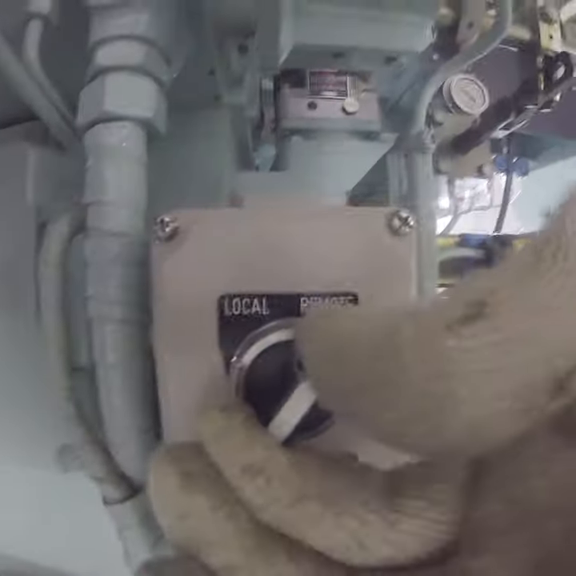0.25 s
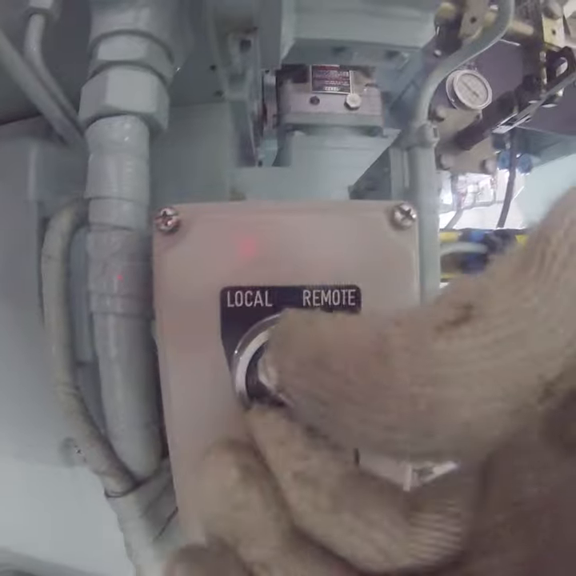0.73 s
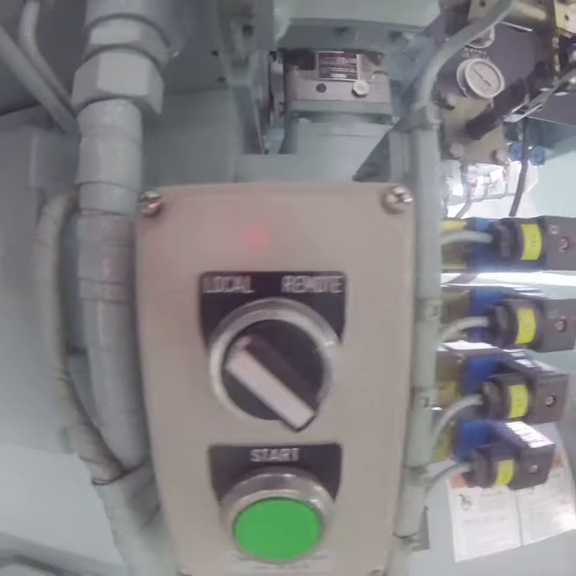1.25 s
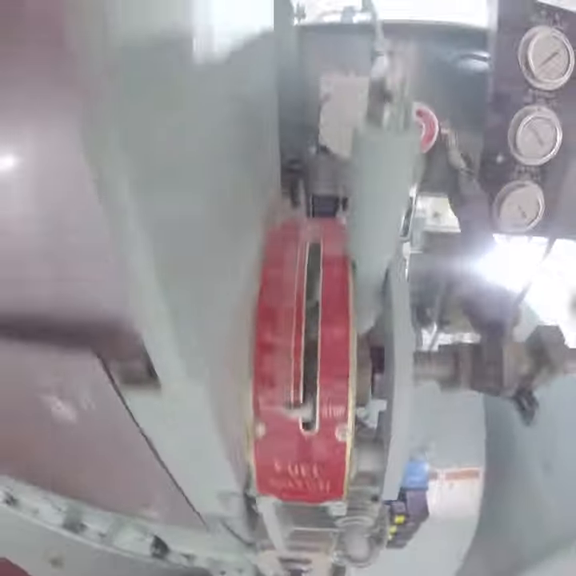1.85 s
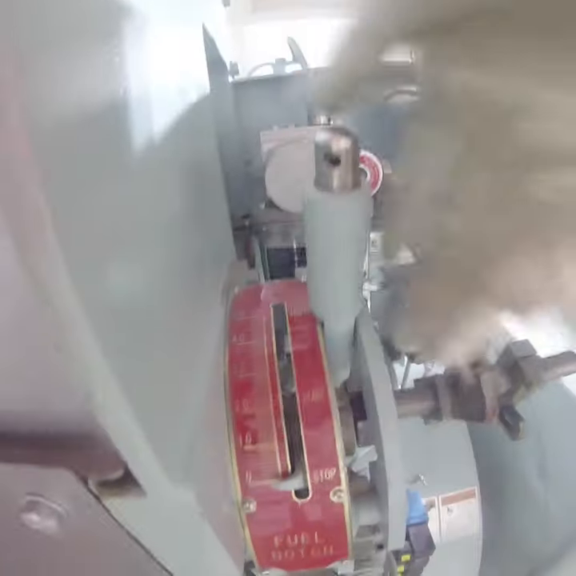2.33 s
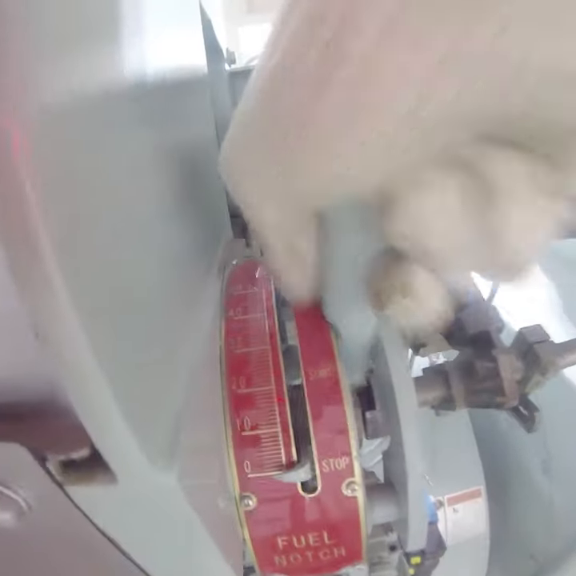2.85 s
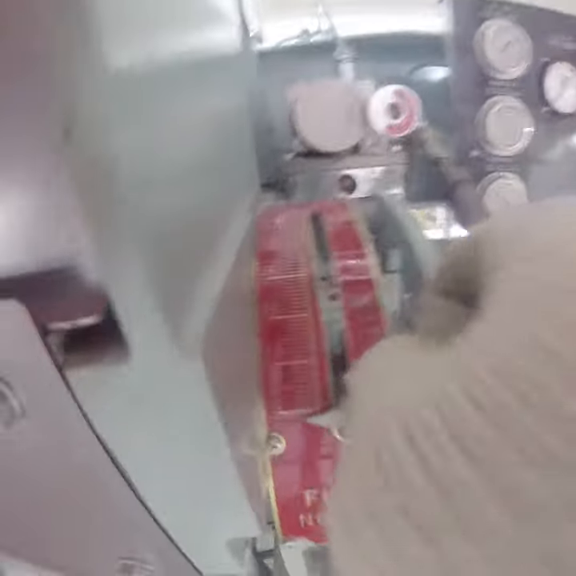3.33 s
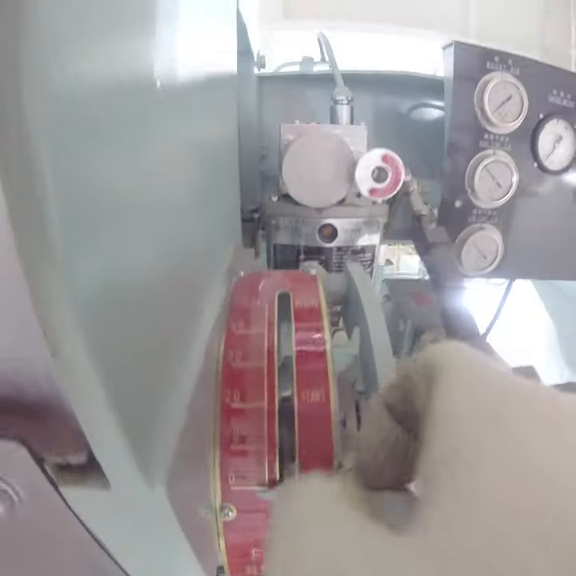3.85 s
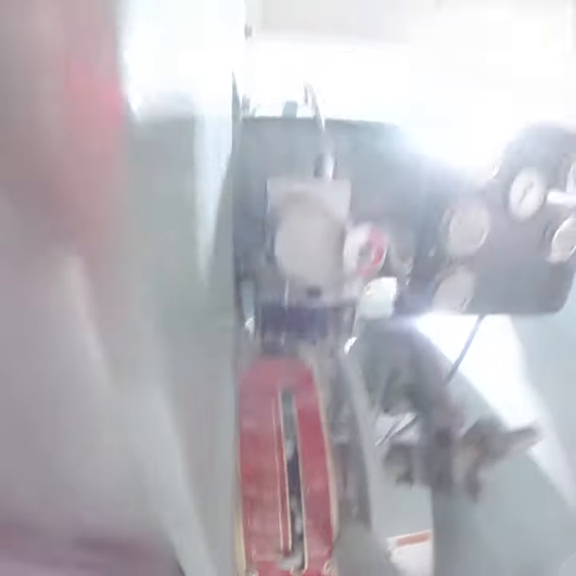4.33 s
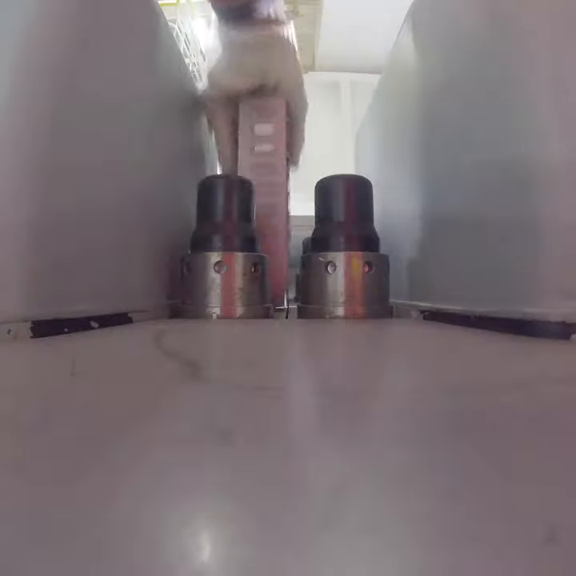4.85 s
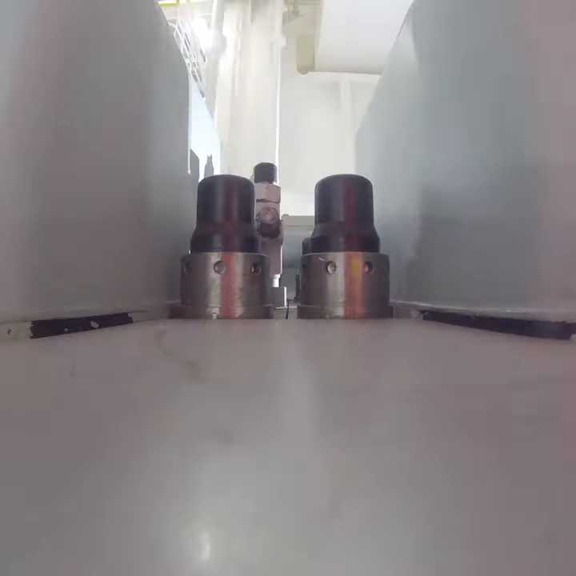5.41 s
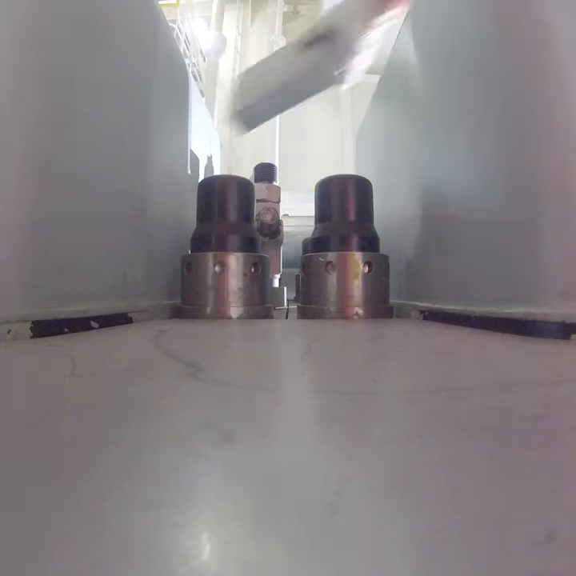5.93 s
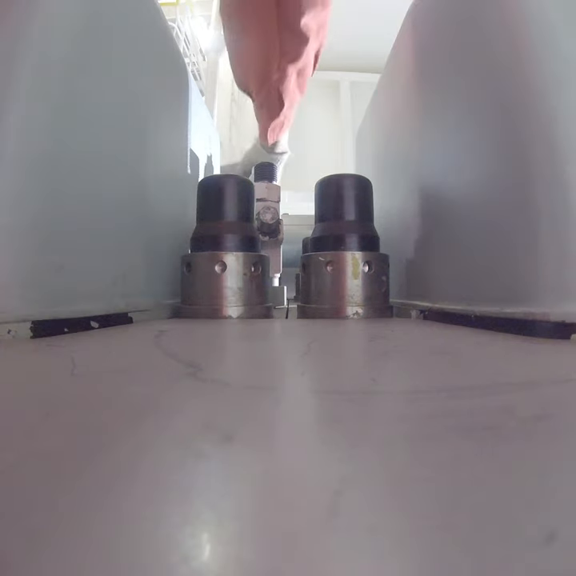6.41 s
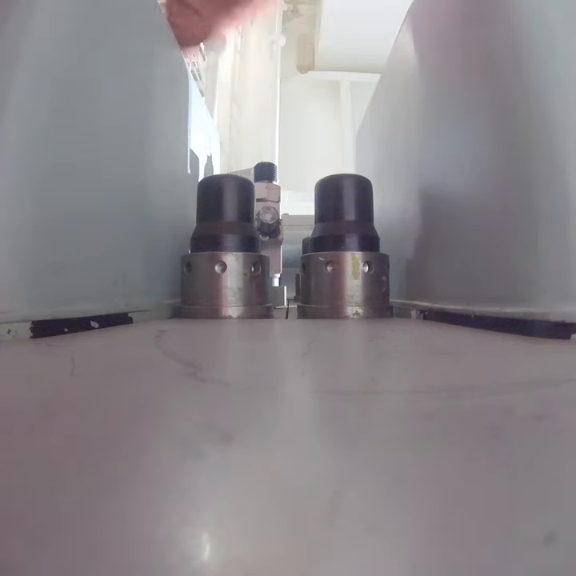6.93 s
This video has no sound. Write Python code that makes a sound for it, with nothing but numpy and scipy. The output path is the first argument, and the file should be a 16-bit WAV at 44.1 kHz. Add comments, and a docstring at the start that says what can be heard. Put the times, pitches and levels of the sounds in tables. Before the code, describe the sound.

A ship's engine room, loud throughout: a large diesel and pumps give a thick, steady low drone with rough broadband roar and a fast repeating clatter about seven and a half times a second. Above it a thin turbocharger whine near 2.7 kHz, with fainter higher tones, constantly fades and returns. At 0.78 s a switch gives one hard, short click. At about 1.55 s the drone abruptly changes colour, with a faint tick, as the listening place moves. Around 3.0 s a glove brushes softly on metal, barely audible. At 4.8 s the place jumps again and the hum balance shifts. From 4.97 to 5.05 s bright metal rattles rapidly, with another knock at 5.17 s. Duller, clunkier knocks and scrapes run from 6.38 to 6.75 s with thin hiss. From 7.1 s compressed air hisses brightly to the end. Small microphone, compressed peaks, dull top.

```python
"""A roaring drone and a fading whine, a switch click, metal knocks, a soft rub, and hiss at the end: a ship's
engine room beside a generator set, the balance of the sound shifting abruptly twice. Diesel and pumps are sums
of steady sines; the hall's roar is coloured noise that partly repeats each engine cycle. Turbocharger whines
are sines and fading tones; the hand's blows are noise bursts through resonances; rub and air are band-passed
noise, and faint ticks are single samples. A small microphone dulls the top."""
import sys
import numpy as np
from scipy import signal
from scipy.fft import rfft, irfft
from scipy.io import wavfile
from scipy.ndimage import uniform_filter1d

SR = 44100
rng = np.random.default_rng(int(sys.argv[2]) if len(sys.argv) > 2 else 0)


def wrap_up_sound(samples):
    """Save the sound to the file named by the first command line argument, as 16-bit audio."""
    columns = np.atleast_2d(samples).T
    # keep every value between -1 and 1, then stretch to whole-number steps
    tamed = np.clip(columns, -1, 1)
    steps = np.round(tamed * 32767).astype(np.int16)
    wavfile.write(sys.argv[1], SR, steps)


N = 316197
TIME_S = np.arange(N) / SR

# Moments when the sound shifts abruptly to a new balance, in seconds.
CHANGES_S = [1.555, 4.8]

# Roar of the hall between the tones, low and high part. # Each row: frequency in Hz, mean level in dB per Hz in
# part 1, 2, 3.
RUMBLE_HZ_DB = [(12, -77, -54, -46), (24.2, -45, -35.5, -58), (32, -45, -50, -40),
                (41.8, -39.5, -45, -43.5), (54.7, -44, -45, -46.5), (82.5, -49.5, -43.5, -45.5),
                (102, -44.5, -40.5, -46.5), (124, -43, -47.5, -45.5), (149, -49, -44.5, -44.5),
                (184, -44, -49, -43), (215, -50.5, -46.5, -45.5), (256, -49, -52.5, -47),
                (345, -51, -53, -52), (405, -52.5, -54, -54)]
ROAR_HZ_DB = [(594, -57, -56, -57), (950, -55, -57, -59), (1300, -60.5, -62, -61.5), (1740, -63, -64, -64),
              (2230, -68, -67.5, -68.5), (2760, -70, -68.5, -69.5), (4300, -79.5, -78, -80),
              (5330, -74, -73, -75), (5720, -78, -78, -78.5), (6490, -74.5, -72.5, -70.5),
              (6930, -84.5, -84, -82.5), (8410, -86.5, -84, -84.5), (9310, -102, -100, -98),
              (10150, -108, -105, -104), (11200, -113, -111, -105), (11300, -140, -138, -132)]
# Slow swell of the roar. Each row: time in seconds, middle, treble and bass gain in dB.
SWELL_S_DB = [(0, -1, -1, -1), (1.4, -.5, -1.5, 2), (2.2, 1, 1, 1), (3.4, 0, -1, -1), (4.77, 0.5, 1.5, 0),
              (4.82, -2.5, -2, -2.5), (5.4, 0, -0.5, -0.5), (6.2, 1.5, 1, .5), (7.17, 1, 1.5, 3)]
CLATTER_SHARE, CLATTER_KEEP = 0.49, 0.832  # power share before band limits; carry-over between cycles
CLATTER_LOW_HZ, CLATTER_TOP_HZ = 248, 2180

CYCLE_HZ = 7.5087  # one four-stroke cycle, two shaft turns
# Strong multiples of the engine cycle.
ORDERS = [5, 11, 12, 16, 17, 23, 24, 32, 34, 35, 36, 38, 44, 48, 53, 54, 56, 108, 132, 185, 199, 240]
# Their levels, in the same order. Each row: nominal rms in dB in part 1, 2, 3.
ORDERS_DB = [(-40, -34, -50), (-39, -38, -36), (-25, -26, -34), (-36, -34, -52), (-33, -31, -32),
             (-34, -44, -38), (-37, -37, -39), (-48, -41, -43), (-44, -42, -37), (-41, -37, -32),
             (-30, -39, -31.5), (-41, -47, -44), (-43, -57, -47), (-38, -41, -46), (-42, -43, -47),
             (-45, -46, -48), (-44, -50, -56), (-47, -47, -47), (-49, -50, -53), (-58, -51, -58),
             (-58, -56, -48), (-49, -50, -48)]
# Steady tones of pumps and fans. Each row: frequency in Hz, nominal rms in dB in part 1, 2, 3.
HUMS_HZ_DB = [(31.14, -26.5, -35, -41), (198.2, -26.5, -27, -34), (300, -59, -49, -36.5),
              (374, -48, -49, -38), (398, -68, -45.5, -49)]

# Turbocharger blade tone. Each row: time in seconds, mean frequency in Hz.
TURBO_S_HZ = [(0, 2660), (.6, 2666), (1.2, 2671.5), (1.75, 2675), (2.9, 2670.5), (3.9, 2660.5), (4.6, 2653),
              (5.2, 2655.5), (6, 2662.3), (7.17, 2663)]
# First partial, fading in and out by echoes in the hall. Each row: time in seconds, nominal rms in dB.
TURBO_S_DB = [(0.02, -37), (0.13, -31.5), (0.19, -37), (0.29, -29), (0.36, -39), (0.45, -33.5), (0.51, -56),
              (0.61, -30.5), (0.81, -35.5), (0.86, -45), (0.97, -30.5), (1.09, -47), (1.15, -54),
              (1.19, -43), (1.22, -34), (1.37, -34), (1.42, -46), (1.5, -28), (1.57, -33), (1.63, -26.5),
              (1.73, -48), (1.88, -27.5), (2.11, -33), (2.14, -31.5), (2.21, -32.5), (2.25, -28),
              (2.3, -30), (2.33, -30), (2.44, -33.5), (2.46, -43.5), (2.54, -27.5), (2.62, -24.5),
              (2.74, -30.5), (2.83, -30.5), (2.89, -37), (3.03, -28.5), (3.1, -33.5), (3.18, -32.5),
              (3.21, -49), (3.32, -34.5), (3.4, -56), (3.48, -34), (3.55, -44), (3.6, -40), (3.63, -56),
              (3.68, -53), (3.7, -39), (3.76, -44), (3.81, -34), (3.88, -33.5), (4.04, -47), (4.18, -31),
              (4.25, -41), (4.31, -27.5), (4.36, -30), (4.39, -42), (4.55, -28), (4.58, -33), (4.66, -47),
              (4.76, -60), (4.79, -33.5), (4.81, -59), (4.85, -59), (4.95, -31), (4.99, -38), (5.22, -36),
              (5.24, -37), (5.3, -32.5), (5.39, -52), (5.5, -30.5), (5.57, -34), (5.63, -31), (5.7, -44),
              (5.78, -28), (5.93, -39), (5.96, -31.5), (6.04, -27.5), (6.09, -50), (6.13, -29.5),
              (6.19, -28), (6.25, -42), (6.28, -44), (6.33, -29), (6.45, -42), (6.55, -36.5), (6.59, -58),
              (6.63, -34), (6.72, -32.5), (6.78, -41), (6.9, -33), (6.97, -59), (6.99, -39), (7.16, -29)]
# Second partial, likewise. Each row: time in seconds, nominal rms in dB.
TURBO_TWICE_S_DB = [(0.02, -44), (0.07, -53), (0.19, -43), (0.22, -61), (0.34, -59), (0.42, -37),
                    (0.48, -55), (0.55, -39.5), (0.67, -48), (0.7, -49), (0.8, -61), (0.85, -44),
                    (0.92, -59), (0.97, -41), (1.04, -60), (1.07, -45), (1.14, -57), (1.22, -43),
                    (1.41, -61), (1.54, -36), (1.57, -51), (1.73, -39.5), (1.86, -61), (1.97, -49),
                    (2.1, -32), (2.14, -52), (2.28, -39), (2.32, -51), (2.4, -41.5), (2.48, -61),
                    (2.52, -48), (2.55, -61), (2.61, -41), (2.78, -38.5), (2.89, -55), (2.94, -38.5),
                    (2.98, -51), (3.04, -37), (3.12, -56), (3.18, -41), (3.22, -51), (3.27, -36),
                    (3.32, -55), (3.37, -36), (3.43, -47), (3.48, -36.5), (3.52, -50), (3.61, -38),
                    (3.64, -54), (3.81, -39), (3.87, -54), (3.91, -41), (3.93, -57), (4.0, -42),
                    (4.05, -54), (4.09, -43), (4.13, -50), (4.19, -39), (4.32, -61), (4.44, -42),
                    (4.48, -61), (4.52, -48), (4.61, -61), (4.66, -40), (4.81, -65), (4.98, -42),
                    (5.02, -50), (5.08, -39), (5.19, -40), (5.24, -61), (5.29, -40), (5.32, -54),
                    (5.4, -43), (5.47, -55), (5.59, -41), (5.75, -66), (5.96, -40), (6.1, -50), (6.17, -40),
                    (6.2, -56), (6.23, -42), (6.27, -51), (6.33, -42), (6.36, -55), (6.43, -39), (6.5, -61),
                    (6.55, -39), (6.65, -58), (6.76, -35.5), (6.84, -52), (6.93, -33.5), (7.03, -58),
                    (7.16, -39)]
# Upper partials. Each row: multiple of the blade tone, mean rms in dB.
TURBO_UPPER_DB = [(3, -55.5), (4, -62), (5, -58)]
# Turbulence round each partial. Each row: multiple of the blade tone, rms in dB, fades per second.
TURBO_SKIRT_DB = [(1, -49, 90), (2, -53, 80), (3, -59.5, 150), (4, -70, 400)]
FADES_PER_S = 7  # per multiple of the blade tone
SCATTER_DB = -24  # flutter of the first two partials, relative to their level
WHINE_HZ, WHINE_DRIFT_HZ, WHINE_DB, WHINE_FADES_PER_S = 6506, 3, -51.5, 6

# Click of the switch: start in seconds, strength in dB, t60 in seconds, body in Hz, body level in dB,
# main ring in Hz, treble ring level in dB.
SWITCH = (0.7795, -10.5, .014, 1900, 0, 5800, -6)
SWITCH_RISE_S, SWITCH_SNAP_DB = .001, 17
# Knocks and scrapes on fittings. Each row: start in seconds, strength in dB, t60 in seconds, body in Hz,
# body level in dB, main ring in Hz, treble ring level in dB.
KNOCKS = [(4.974, -23, .12, 2600, -7, 6300, 5), (4.984, -14, 0.05, 2600, -9, 6350, -2),
          (4.998, -20, .1, 2000, 5, 6250, 8), (5.011, -23, 0.064, 3080, -1, 6200, 9),
          (5.021, -11, 0.05, 3100, -12, 6240, 1), (5.033, -16.5, 0.055, 3080, -15, 6240, 3),
          (5.043, -18, 0.12, 2980, -8, 6400, 3), (5.169, -16, 0.16, 2970, -9, 6400, -22),
          (6.384, -13, .06, 1200, -10, 6300, 2), (6.411, -15, 0.07, 1000, 2, 5300, -14),
          (6.417, -9.5, 0.076, 900, 5, 5900, -8), (6.427, -19, 0.065, 1300, 5, 5900, -6),
          (6.440, -17.5, .1, 1100, 1, 6200, -7), (6.462, -22, 0.069, 1200, 5, 6300, -14),
          (6.555, -14.5, .08, 1500, -5, 6160, -12), (6.58, -25, .08, 1500, -5, 6200, -12),
          (6.629, -21, 0.13, 1500, 5, 6100, -12), (6.72, -22, 0.13, 1800, 5, 6100, -15)]
KNOCK_RISE_S, KNOCK_SNAP_DB = 0.003, -3
# Resonances besides the main ring. Each row: centre in Hz, width per pass in Hz, level in dB.
RING_HZ_DB = [(3020, 1300, -13.5), (4480, 810, -8.5), (5550, 790, -3.5)]
# Treble resonances, raised or lowered by each blow's own treble level.
# Each row: centre in Hz, width per pass in Hz, level in dB before that treble level.
TREBLE_RING_HZ_DB = [(7350, 810, -27), (10100, 1900, -28), (12500, 1500, -27)]
RING_WIDTH_HZ, BODY_WIDTH_HZ = 670, 1270  # per pass

# Faint ticks. Each row: time in seconds, peak in dB before the high-pass.
TICKS_S_DB = [(1.5564, -27), (4.7975, -38), (7.117, -21)]
TICK_HZ = 9000
# Glove brushing past: start, rise and fall in seconds, rms in dB, centre in Hz, width in Hz.
RUB = (3.0, .035, .08, -36.5, 2600, 2600)
# Thin hiss among the knocks, then compressed air at the end.
# Each row: start, rise, hold and fall in seconds, nominal rms in dB.
AIR_S_DB = [(6.42, 0.028, 0.3, .12, -44), (7.108, 0.05, .1, .05, -29)]
AIR_HZ, AIR_TREBLE_DB = 6160, 1

DRIVE = 1.27  # input gain into the rounding of peaks
MIC_HZ, TOP_HZ = 11050, 15900  # microphone roll-off, final cut-off


def undb(db):
    """Decibels to amplitude ratio."""
    return 10 ** (np.asarray(db) / 20)


def curve(table, column):
    """One column of a table, joined by straight lines in time."""
    rows = np.array(table, float)
    return np.interp(TIME_S, rows[:, 0], rows[:, column])


def parts():
    """Weight of each part of the sound over time; each change takes 10 ms."""
    gone = [np.clip((TIME_S - s) / .01 + .5, 0, 1) for s in CHANGES_S]
    return np.array([1 - gone[0], gone[0] - gone[1], gone[1]])


def walk(rate_hz):
    """Random levels held 1 / rate_hz and slewed twice; spread 1."""
    hold = int(SR / rate_hz)
    levels = np.repeat(rng.standard_normal(N // hold + 1), hold)
    slewed = uniform_filter1d(uniform_filter1d(levels, hold), hold)[:N]
    return slewed / slewed.std()


def resonate(x, hz, width_hz):
    """Band-pass with gain 1 at the centre."""
    return signal.lfilter(*signal.iirpeak(hz, hz / width_hz, fs=SR), x)


def twice(x, hz, width_hz):
    """A steep resonance: two equal passes."""
    return resonate(resonate(x, hz, width_hz), hz, width_hz)


def tone(hz, db):
    """A sine of rms level db that follows hz, from a random phase."""
    turns = np.cumsum(hz + 0 * TIME_S) / SR + rng.random()
    return np.sqrt(2) * undb(db) * np.sin(2 * np.pi * turns)


def faded(hz, db, fades_per_s):
    """A tone heard over many paths: two quadratures wander apart, so it fades and returns."""
    turn = np.exp(2j * np.pi * np.cumsum(hz) / SR)
    paths = walk(fades_per_s) + 1j * walk(fades_per_s)
    return undb(db) * np.real(paths * turn)


def clatter():
    """Valve and piston noise: each cycle repeats most of the one before; rms 1."""
    size = round(SR / CYCLE_HZ)
    fresh = rng.standard_normal((N // size + 41, size))
    fresh_gain = np.sqrt(1 - CLATTER_KEEP ** 2)
    cycles = signal.lfilter([fresh_gain], [1, -CLATTER_KEEP], fresh, axis=0)
    return cycles[40:].ravel()[:N]  # skip the build-up


def hall():
    """Broad roar, partly repeating with the engine cycle, coloured differently in each part and swelling by
    band."""
    hz = np.maximum(np.fft.rfftfreq(N, 1 / SR), 1)
    share = CLATTER_SHARE / (1 + (CLATTER_LOW_HZ / hz) ** 2) / (1 + (hz / CLATTER_TOP_HZ) ** 4)
    white = np.sqrt(share) * rfft(clatter()) + np.sqrt(1 - share) * rfft(rng.standard_normal(N))
    rows = np.array([(4, -90, -90, -90)] + RUMBLE_HZ_DB + ROAR_HZ_DB, float)
    above_bass = 1 / (1 + (300 / hz) ** 2)
    treble = 1 / (1 + (3000 / hz) ** 4)
    bands = [1 - above_bass, above_bass - treble, treble]
    bass_db = curve(SWELL_S_DB, 3) + 0.75 * walk(2.114)
    middle_db = curve(SWELL_S_DB, 1) + 0.95 * walk(9)
    treble_db = curve(SWELL_S_DB, 2) + 1.0 * walk(6.01)
    out = 0
    for k, here in enumerate(parts()):
        colour_db = np.interp(np.log(hz), np.log(rows[:, 0]), rows[:, k + 1])
        colour = undb(colour_db) * np.sqrt(SR / 2)  # density to white-noise gain
        for band, swell_db in zip(bands, [bass_db, middle_db, treble_db]):
            out = out + here * undb(swell_db) * irfft(white * colour * band, N)
    return out


def diesel_and_pumps():
    """Steady lines, each wavering a little, each with its own level in each part."""
    here = parts()
    orders = [(k * CYCLE_HZ, *db) for k, db in zip(ORDERS, ORDERS_DB)]
    out = 0
    for hz, *place_db in orders + HUMS_HZ_DB:
        out = out + tone(hz, 1.6 * walk(3.52)) * (undb(place_db) @ here)
    return out


def whines():
    """Turbocharger blade tones with turbulence round the partials, and a second, higher whine."""
    hz = curve(TURBO_S_HZ, 1) * (1 + 0.000391 * walk(13))
    out = 0
    for k, table in enumerate([TURBO_S_DB, TURBO_TWICE_S_DB], start=1):
        s, level_db = np.transpose(table)
        level = np.interp(TIME_S, s, undb(level_db))
        partial = tone(k * hz, 1.25 * walk(40)) + faded(k * hz, SCATTER_DB, 2 * FADES_PER_S)
        out = out + partial * level
    for k, db in TURBO_UPPER_DB:
        out = out + faded(k * hz, db, k * FADES_PER_S)
    for k, db, fades_per_s in TURBO_SKIRT_DB:
        out = out + faded(k * hz, db, fades_per_s)
    whine_hz = WHINE_HZ + WHINE_DRIFT_HZ * walk(1.5)
    return out + faded(whine_hz, WHINE_DB, WHINE_FADES_PER_S)


def ring(x, main_hz, treble_db):
    """Bright colour of thin fittings: a main resonance plus fixed ones."""
    def modes(rows):
        """Sum of resonances, one a row."""
        return sum(undb(db) * twice(x, hz, width_hz) for hz, width_hz, db in rows)
    main = twice(x, main_hz, RING_WIDTH_HZ)
    return main + modes(RING_HZ_DB) + undb(treble_db) * modes(TREBLE_RING_HZ_DB)


def hand():
    """Each blow is a snap and a rough burst that dies away, heard through body and ring."""
    out = np.zeros(N)
    grit = rng.standard_normal(N) * undb(2.5 * walk(600))
    age_s = np.arange(SR // 4) / SR
    blows = [(*SWITCH, SWITCH_RISE_S, SWITCH_SNAP_DB)]
    blows += [(*row, KNOCK_RISE_S, KNOCK_SNAP_DB) for row in KNOCKS]
    for s, db, t60_s, body_hz, body_db, ring_hz, treble_db, rise_s, snap_db in blows:
        start = int(s * SR)
        stop = start + len(age_s)
        shape = (1 - np.exp(-age_s / rise_s)) * np.exp(-np.log(1000) * age_s / t60_s)
        burst = grit[start:stop] * shape
        burst = burst * 1.3 * np.linalg.norm(shape) / np.linalg.norm(burst)  # energy set by the shape
        burst[int(rise_s * SR)] += undb(snap_db)
        body = undb(body_db) * twice(burst, body_hz, BODY_WIDTH_HZ)
        out[start:stop] += undb(db) * (body + ring(burst, ring_hz, treble_db))
    return out


def ticks():
    """Single-sample impulses, high-passed so that only the treble is heard."""
    out = np.zeros(N)
    for s, db in TICKS_S_DB:
        out[int(s * SR)] = undb(db)
    return signal.sosfilt(signal.butter(2, TICK_HZ, "high", fs=SR, output="sos"), out)


def rub():
    """A soft, broad brush of cloth on metal: band-passed noise that rises and falls."""
    s, rise_s, fall_s, db, hz, width_hz = RUB
    hiss = twice(twice(rng.standard_normal(N), hz, width_hz), hz, 2 * width_hz)
    rise = (TIME_S - s) / rise_s
    fall = 1 - (TIME_S - s - rise_s) / fall_s
    return undb(db) * hiss / hiss.std() * np.clip(np.minimum(rise, fall), 0, 1)


def air():
    """Hiss as of leaking air: noise through the ring resonances, fluttering a little."""
    hiss = ring(rng.standard_normal(N), AIR_HZ, AIR_TREBLE_DB)
    gate = 0
    for s, rise_s, hold_s, fall_s, db in AIR_S_DB:
        rise = (TIME_S - s) / rise_s
        fall = 1 - (TIME_S - s - rise_s - hold_s) / fall_s
        gate = gate + undb(db) * np.clip(np.minimum(rise, fall), 0, 1)
    return hiss / hiss.std() * gate * undb(1.8 * walk(45))


def scene():
    """Sum of all sources but the ticks, one channel."""
    return (hall() + diesel_and_pumps() + whines() + hand() + rub() + air())[None]


def record(dry):
    """The input rounds peaks, the microphone dulls the top; ticks join before the final cut-off."""
    rounded = np.tanh(DRIVE * dry) / DRIVE
    heard = signal.sosfilt(signal.butter(10, MIC_HZ, fs=SR, output="sos"), rounded)
    return signal.sosfilt(signal.ellip(10, .2, 70, TOP_HZ, fs=SR, output="sos"), heard + ticks())


dry = scene()
out = record(dry)
wrap_up_sound(out)
```